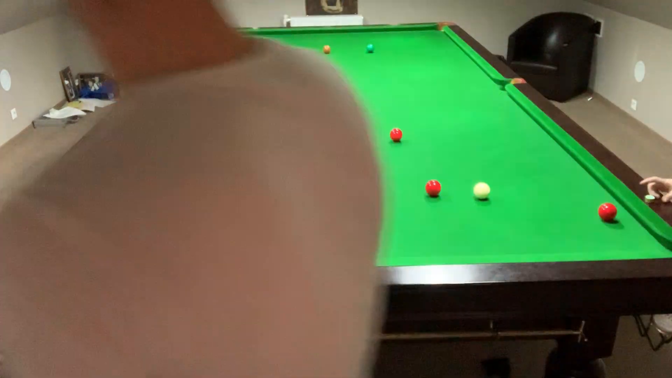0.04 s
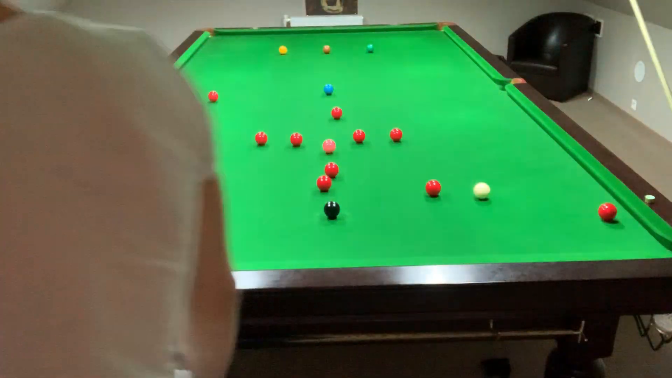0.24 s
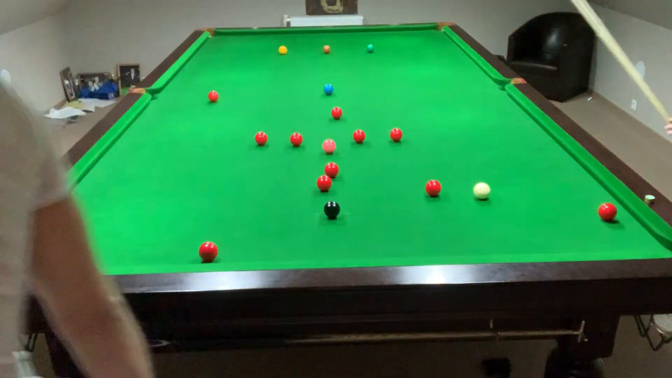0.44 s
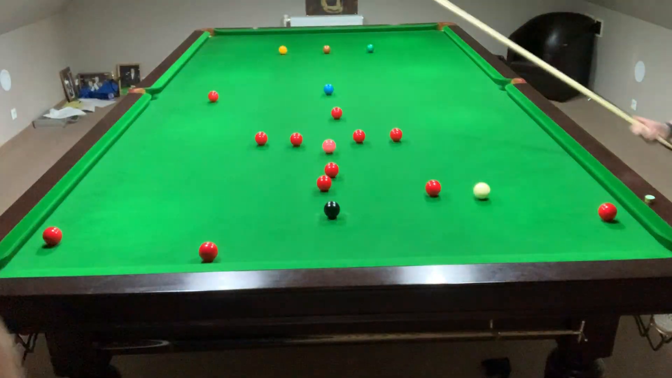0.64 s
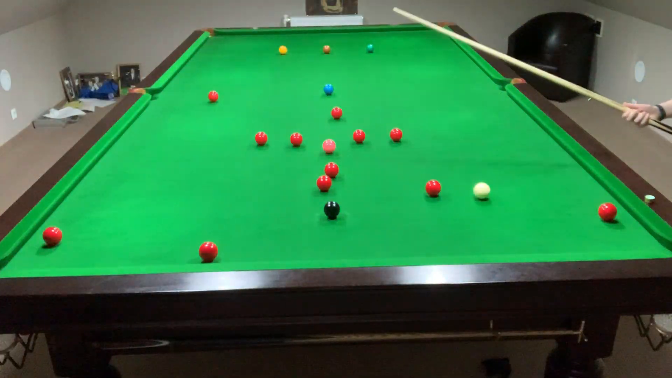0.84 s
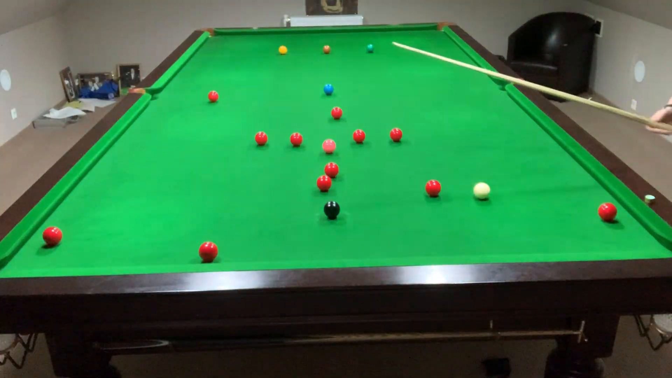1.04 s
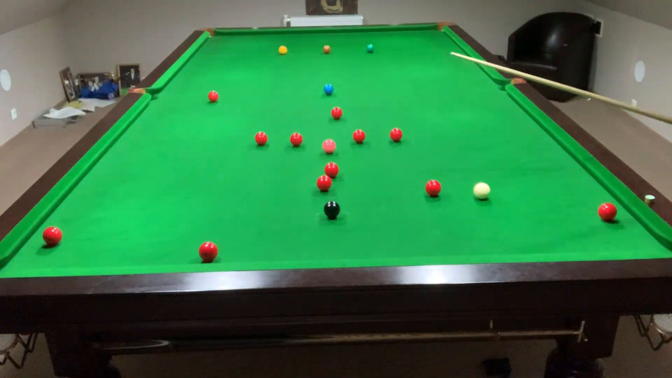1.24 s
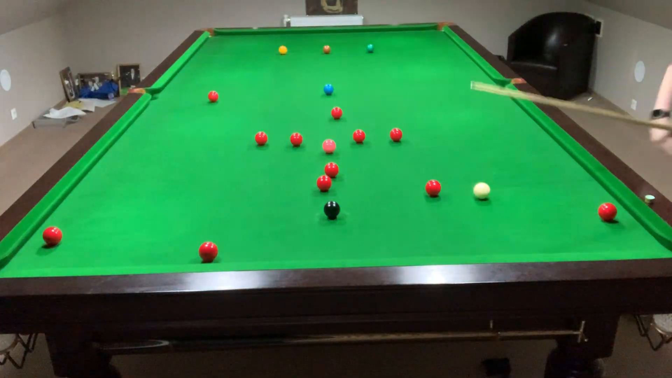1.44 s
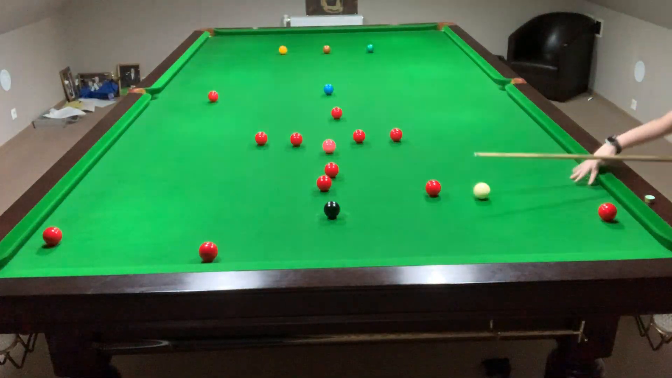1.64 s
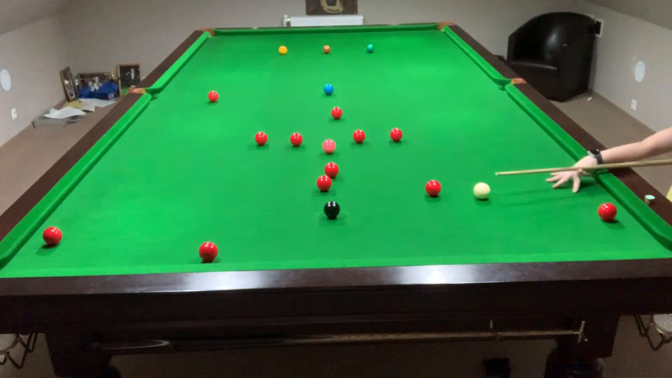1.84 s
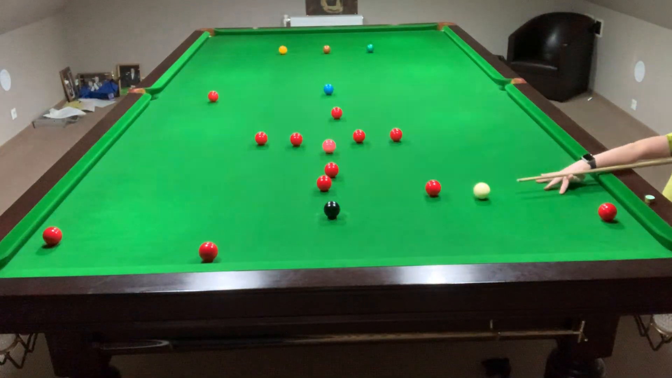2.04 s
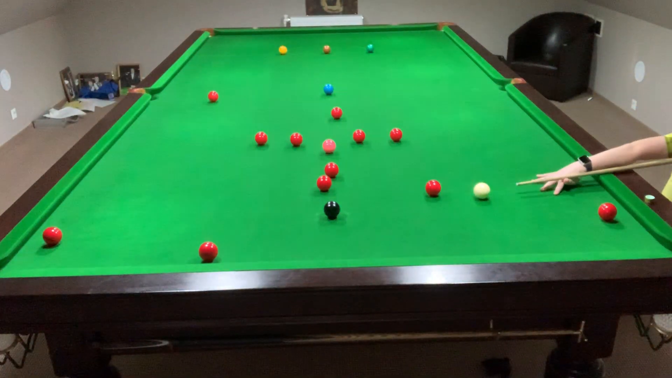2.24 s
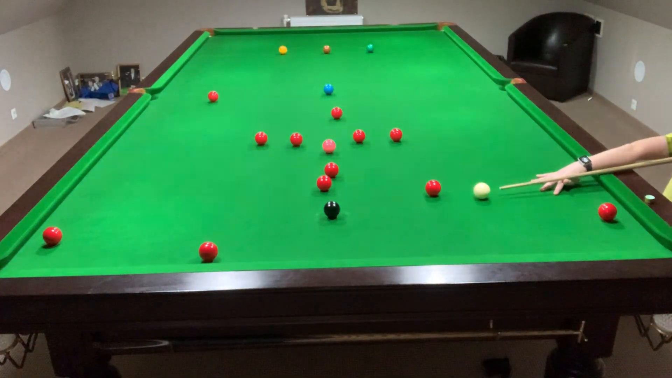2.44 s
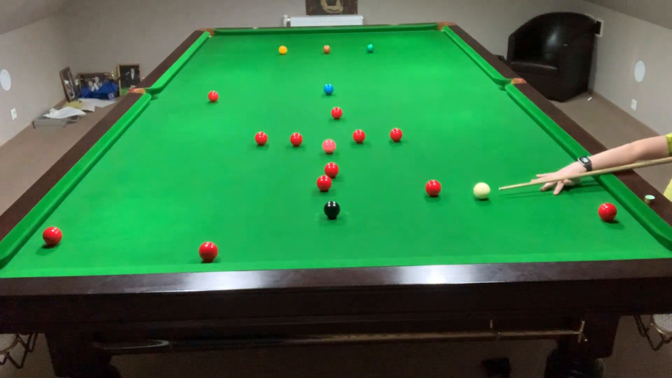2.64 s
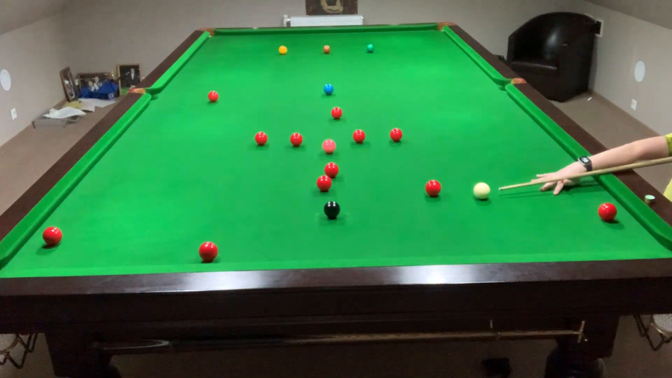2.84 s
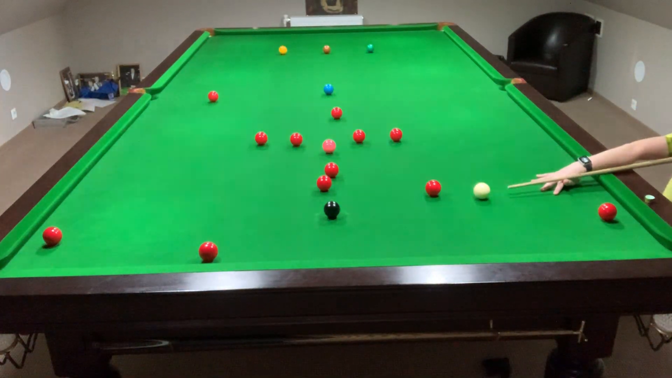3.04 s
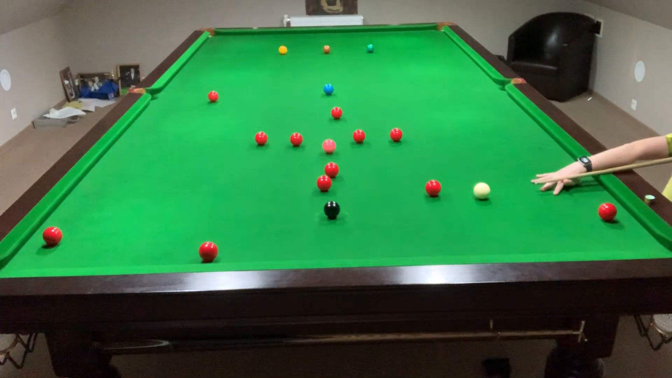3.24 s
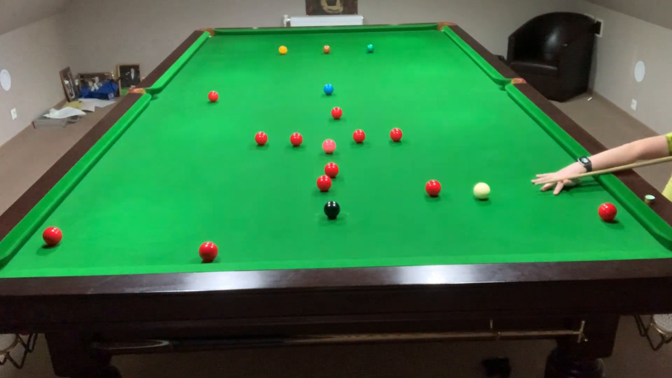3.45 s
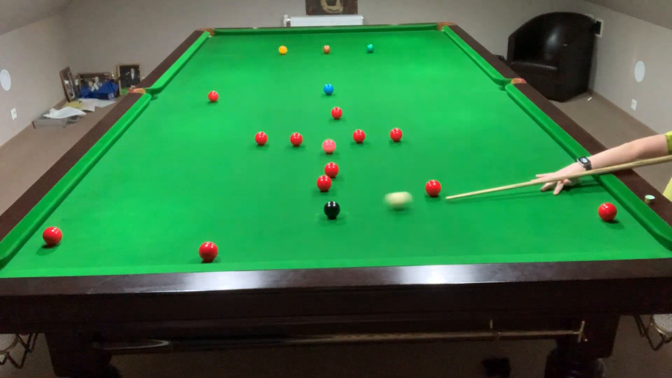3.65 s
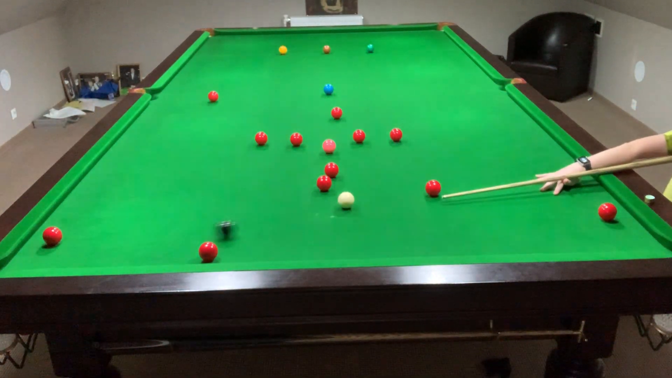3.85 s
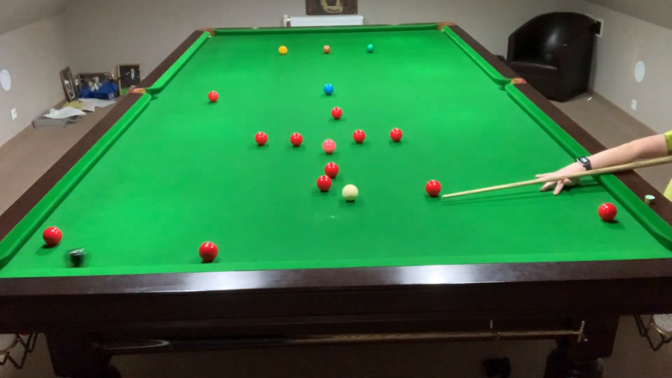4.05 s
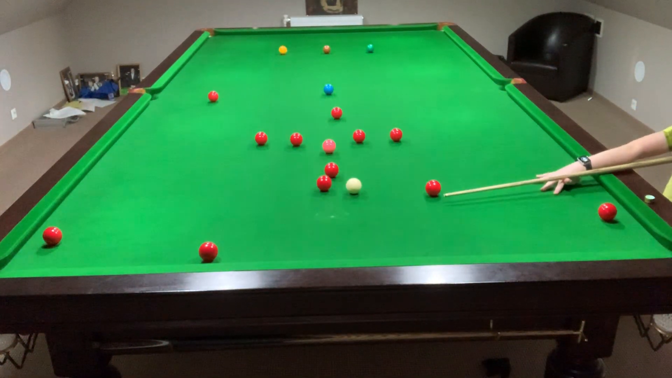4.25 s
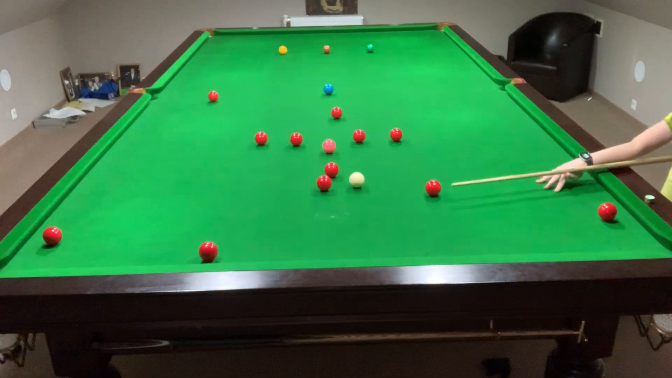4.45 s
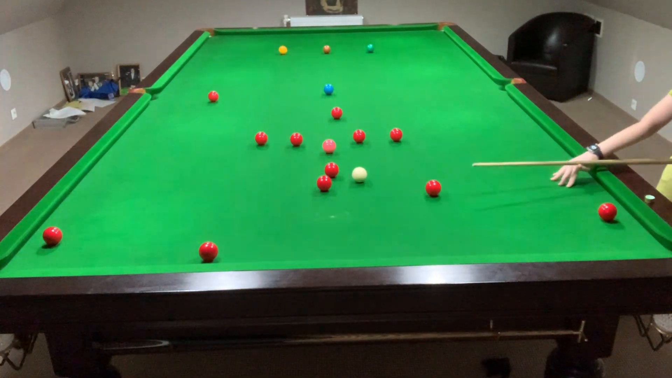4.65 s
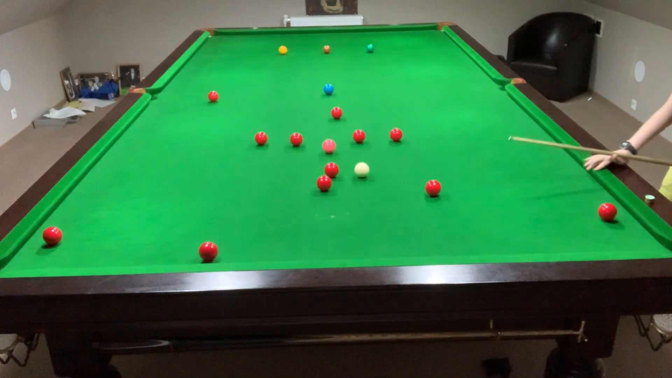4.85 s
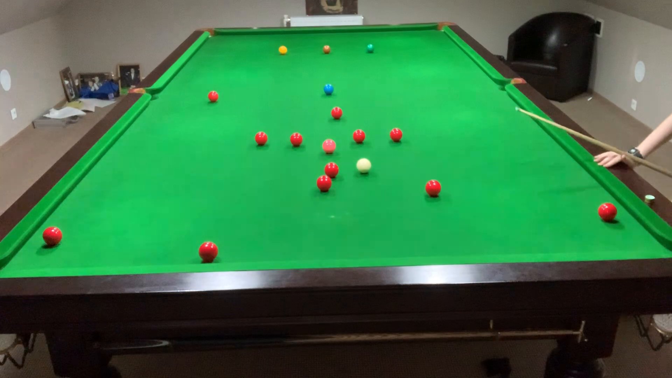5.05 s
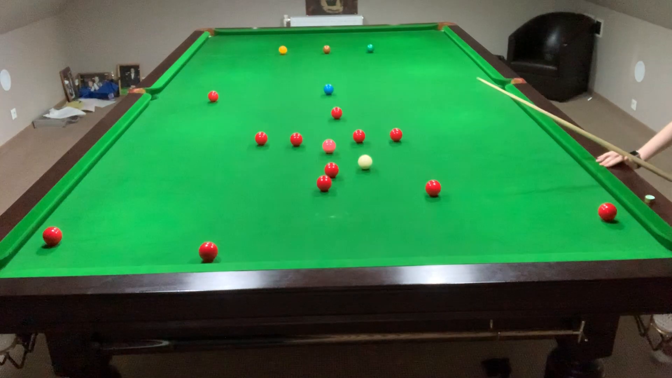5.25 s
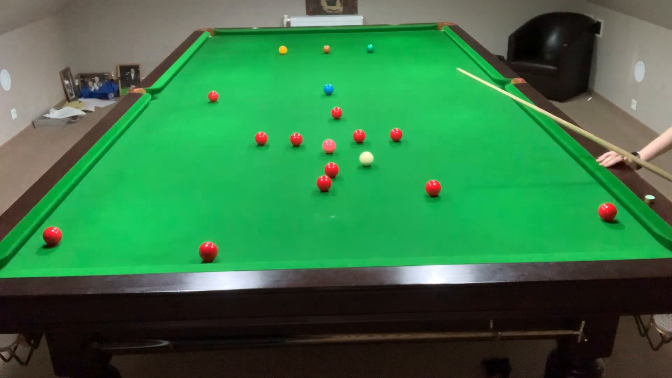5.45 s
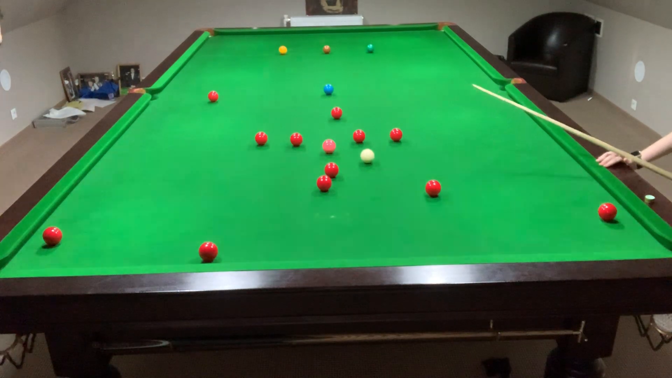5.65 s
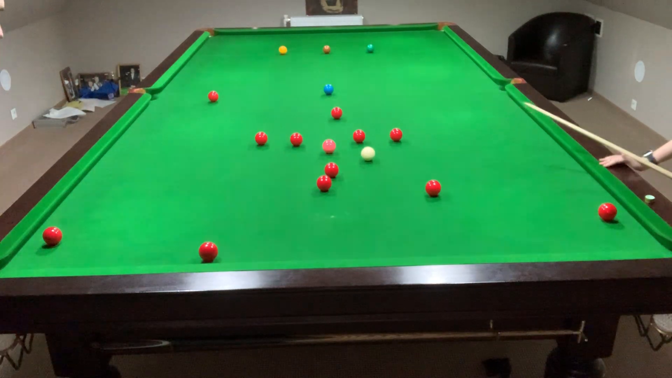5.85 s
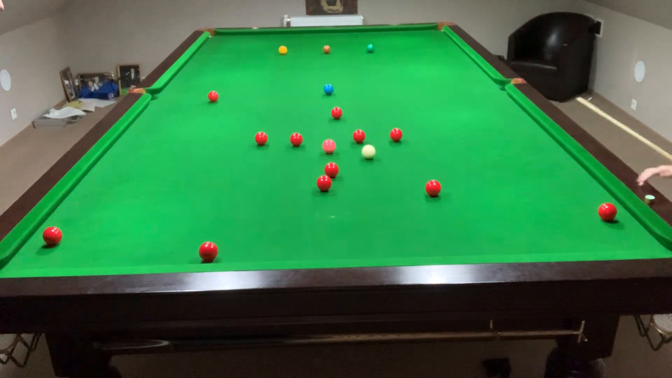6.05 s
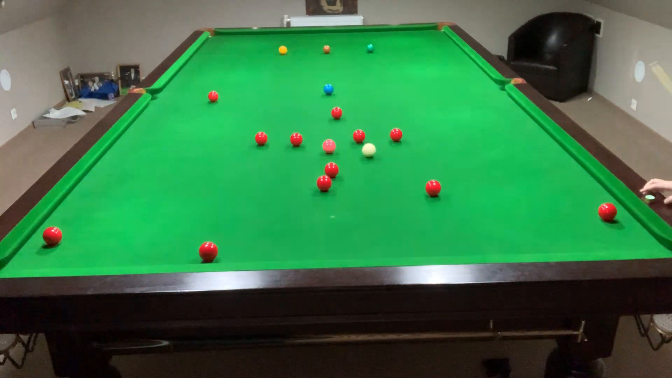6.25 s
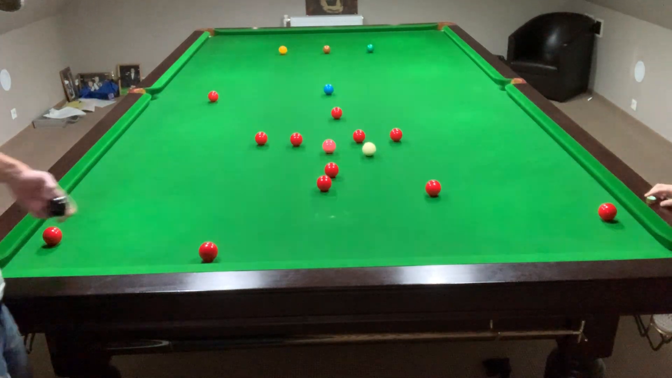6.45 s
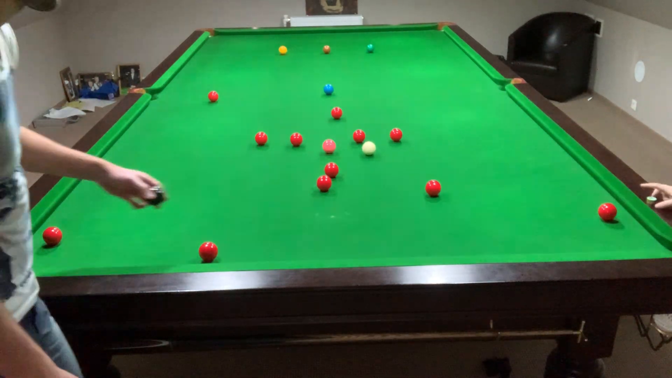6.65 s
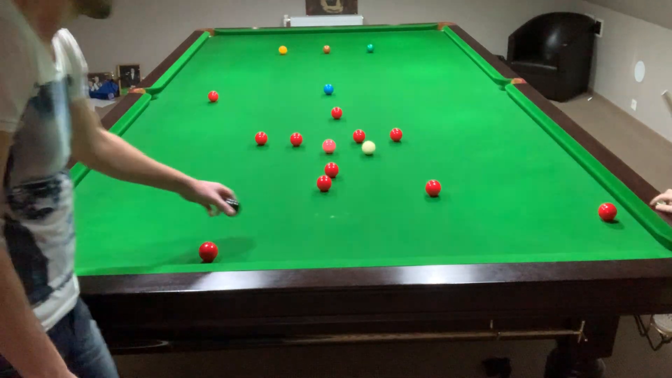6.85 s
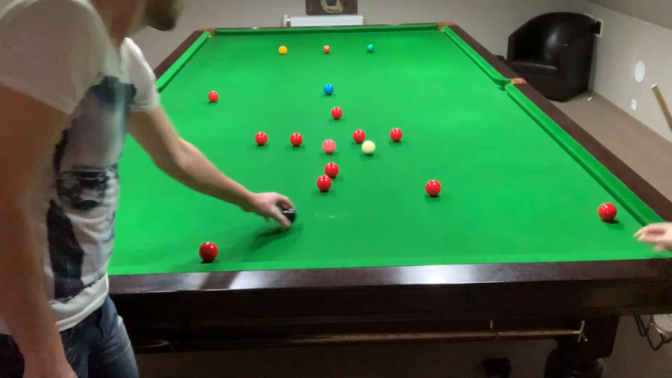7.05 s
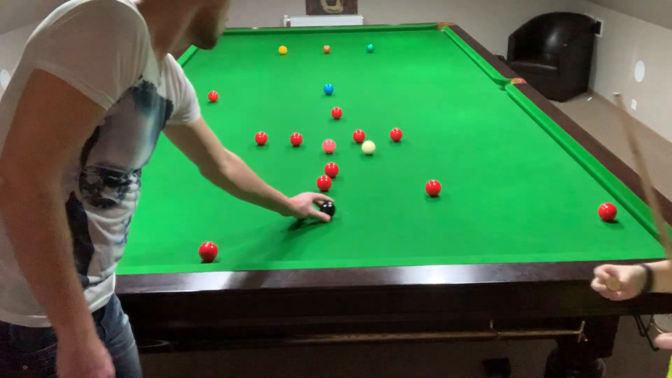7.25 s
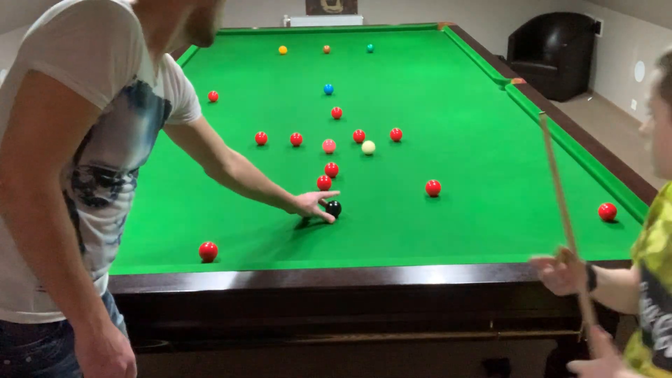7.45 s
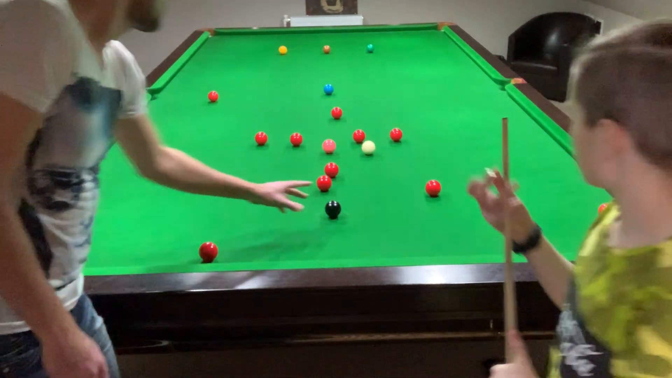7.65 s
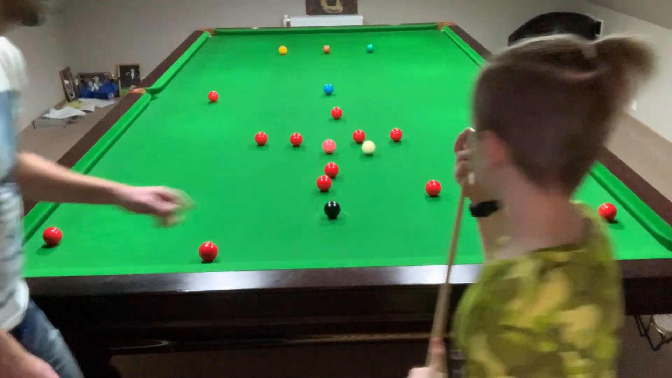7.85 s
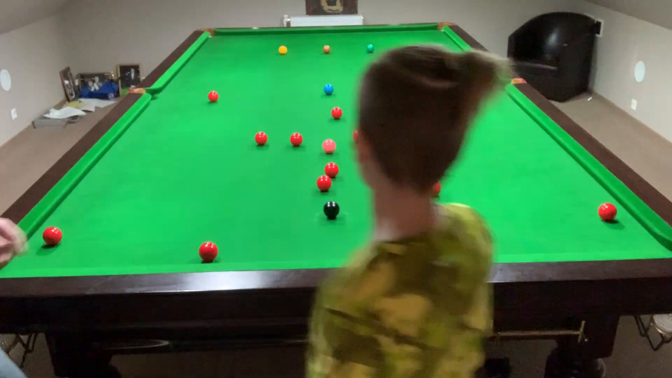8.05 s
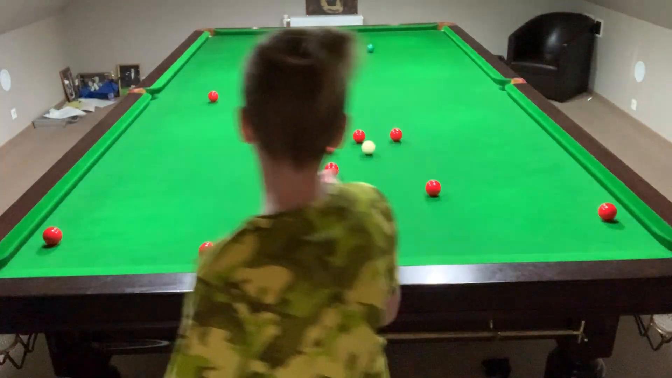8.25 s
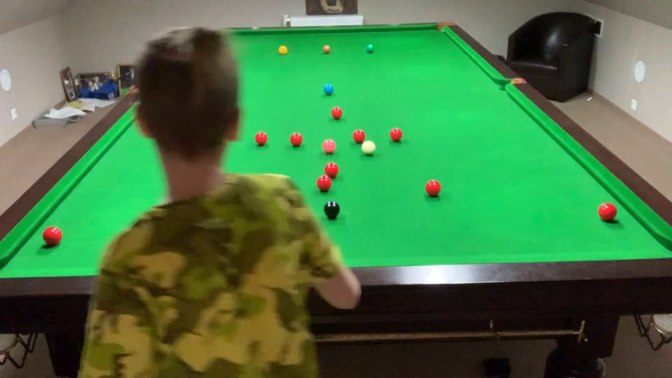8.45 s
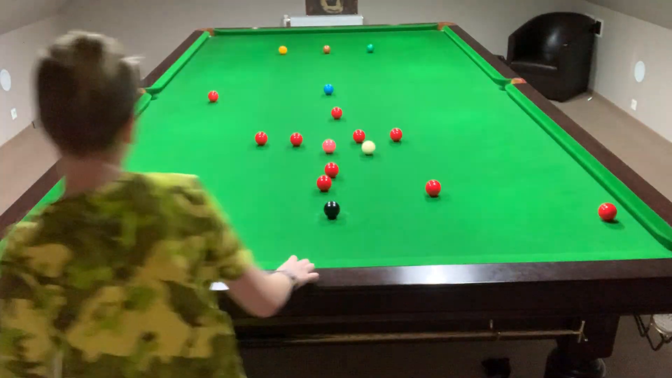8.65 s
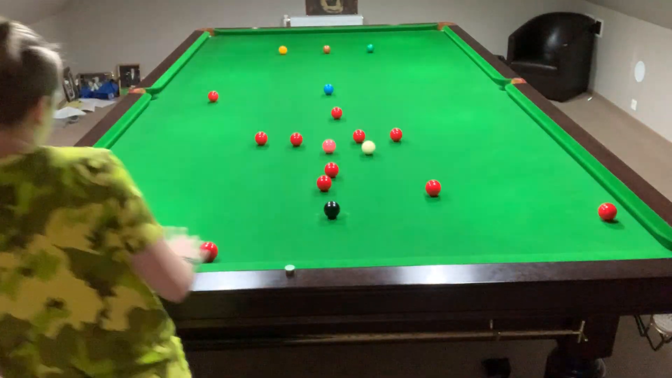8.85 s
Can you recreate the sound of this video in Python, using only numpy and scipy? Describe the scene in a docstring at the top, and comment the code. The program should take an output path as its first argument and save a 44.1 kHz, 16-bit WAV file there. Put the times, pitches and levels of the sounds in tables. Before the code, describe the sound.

Close to a snooker table in a small, hard-walled room, clothes rustle softly over a low rumble, faint bird chirps and a muffled engine outside. After a quiet wait, the cue tip knocks the white, which clacks sharply into the black. Half a second later the black thuds and rattles in a woody pocket, then clicks against other balls in the rail. The engine revs up and drops away; soft footsteps and scuffs end the scene.

```python
"""A snooker shot in a small, hard-walled room: impacts through filtered pulses and damped modes.
The cue strikes the white, the white clicks into the black, and the black thuds into a corner pocket
and clicks against the balls in its rail. Filtered noise makes soft rustles, scuffs and footfalls.
Faintly through the walls, swept sines chirp as small birds and low harmonics rev up and down as an engine,
over a low rumble; reflections and a decaying diffuse tail form the room."""
import sys
import numpy as np
from scipy import signal
from scipy.fft import rfft, irfft, next_fast_len
from scipy.io import wavfile

SR = 44100
rng = np.random.default_rng(int(sys.argv[2]) if len(sys.argv) > 2 else 0)


def wav_record(signal):
    """Record a signal, one row per channel, as 16-bit PCM in the file named by sys.argv[1]."""
    frames = np.transpose(np.atleast_2d(signal))
    bounded = np.clip(frames, -1, 1)
    # unit amplitude maps onto the largest positive 16-bit level
    quanta = np.round(bounded * 32767).astype(np.int16)
    wavfile.write(sys.argv[1], SR, quanta)


N = 392931
TIME, HZ = np.arange(N) / SR, np.fft.rfftfreq(N, 1 / SR)

# Levels in the tables are relative; each source sets its own overall level.
# Engine speed and load: start_s, firing_rate_hz, level_db
ENGINE_COURSE = [(0.0, 50.8, -40.5), (0.4, 51.84, -40.5), (0.75, 52.8, -41), (0.972, 52.9, -66),
                 (1.241, 39.67, -43), (2.15, 41.13, -38.5), (2.65, 38.2, -47), (3.07, 41.02, -41),
                 (3.97, 48.78, -41), (4.209, 55.1, -35.5), (4.421, 62.1, -37.5), (4.72, 76, -37),
                 (4.95, 85.5, -28), (5.14, 86.7, -33), (5.33, 77, -53.5), (6.421, 52.2, -70),
                 (6.569, 53.3, -32.5), (6.73, 59.2, -41), (6.95, 55.44, -41), (7.15, 61.9, -35.5),
                 (7.4, 53, -47.5), (8.051, 52.7, -43.5), (8.3, 52.5, -55), (8.9, 52.6, -55)]
# Strength of firing orders 1, 2 and 3: level_db
FIRING_ORDERS = [1, -6.5, -9]
# Effect of walls and room resonances on the bass: frequency_hz, level_db
BASS_TRANSMISSION = [(40, -1.5), (45, -19), (52, -7), (58, 0.5), (63, -3.5), (76, 5), (81, -2), (85, 0.5),
                     (95, -3), (105, 0), (123, -3.5), (145, -2), (172, -11), (250, -20)]
# Spectrum of the room's rumble: frequency_hz, level_db
RUMBLE_SPECTRUM = [(20, -15.5), (35, -26.5), (50, 2.5), (85, -1), (150, -5), (220, -12.5), (400, -20.5),
                   (800, -24), (2000, -55), (6000, -60.5)]
RUMBLE_DB = -46

# Soft rustles: clothes brushing, the cue sliding over the hand, a chink's bright hiss:
# peak_s, fade_s, swish_level_db, hiss_level_db
RUSTLE_SWELLS = [(0.01, 0.058, -44.5, -57.5), (.15, 0.052, -58, -59), (0.48, 0.17, -58, -65.5),
                 (0.771, 0.24, -55, -58), (1.38, 0.099, -60.5, -61.5), (1.9, 0.32, -60.5, -70.5),
                 (3.632, 0.083, -52.5, -64.5), (4.88, 0.79, -51.5, -73.5), (5.422, 0.045, -59.5, -57.5),
                 (7.0, 0.59, -62.5, -77), (7.33, 0.12, -56, -62), (7.849, 0.23, -62, -75),
                 (8.28, 0.033, -71, -61.5), (8.53, 0.093, -61, -59), (8.77, 0.052, -69, -58)]
RUSTLE_RISE = 0.47  # rising time as a share of fading time
STILL_SWISH_DB, STILL_HISS_DB = -61.5, -81.5  # what is left between the rustles
# Spectrum of the soft swish: frequency_hz, level_db
SWISH_SPECTRUM = [(150, -17), (300, 12.5), (700, 4.5), (1500, 2), (2500, -2.5), (4500, -9), (9000, -33),
                  (16000, -30)]
# Spectrum of the fine hiss: frequency_hz, level_db
HISS_SPECTRUM = [(1000, -5.5), (3000, 11), (5000, 8), (7500, 12), (9500, 6), (14000, -2.5), (16000, -3.5)]

# Low knocks that excite the table's wooden frame: start_s, level_db
FRAME_KNOCKS = [(0.0, -27), (4.2985, -1.5), (8.72, -33.5)]
# Modes of the wooden frame: pitch_hz, level_db, t60_s
FRAME_RESONANCES = [(273, -12, 0.93), (320, 3, 1), (346.4, 1.5, 0.87), (383, -5.5, 0.72), (415.6, -3, 0.54),
                    (521, -12, 0.37)]

# Chinks of a small piece of metal: start_s, level_db
METAL_CHINKS = [(.141, -48)]
# Modes of the metal: pitch_hz, level_db, t60_s
METAL_MODES = [(5450, -13, 0.087), (6250, -6, 0.043), (7070, 4.5, 0.047), (7450, 3.5, 0.12)]

# Bird chirps: start_s, level_db, reference_pitch_hz
BIRD_CHIRPS = [(0.325, 4, 4880), (1.308, 6.5, 4450), (1.76, -4.5, 4450), (1.84, -0.5, 4530),
               (2.094, -1, 4320), (2.34, -1, 5400), (2.554, -3, 4730), (2.852, 0, 4270), (3.007, 4.5, 5430),
               (3.309, -6.5, 4126), (3.418, -1, 4550), (3.585, 3, 4900), (4.09, -3, 4320),
               (4.236, -1.5, 5100), (4.675, 2, 4510), (5.105, -0.5, 5090), (5.167, 3.5, 4538),
               (5.3, -4, 4200), (5.681, 1, 4394), (5.812, 4.5, 4500), (5.85, 2, 4560), (6.211, 4.5, 4840),
               (6.802, -0.5, 4524), (6.911, -0.5, 4310), (7.104, -2.5, 5200), (7.462, -2, 5100),
               (7.634, 4.5, 4700), (8.058, 3, 4890), (8.66, 9, 4570), (8.762, 1, 5340)]
# Strokes within a chirp: delay_s, pitch_ratio (share of the reference), level_db
CHIRP_STROKES = [(0, 0.98, 2), (.026, .86, -3), (.062, .78, -0.5)]

# Cue tip on the white: one knock and its two early reflections: start_s, level_db
CUE_KNOCK = [(3.6492, -1), (3.6528, 7.5), (3.6568, -13.5)]
# Spectrum of the tip's knock: frequency_hz, level_db
CUE_SPECTRUM = [(100, -8), (250, -3.5), (500, -0.5), (1100, -0.5), (1800, -6), (2600, -4), (3600, -10.5),
                (4300, -7.5), (4800, -20), (6600, -20), (7600, -35), (12000, -31), (16000, -40.5)]
# Modes of the shaft: pitch_hz, level_db, t60_s
SHAFT_MODES = [(540, -14, 0.24), (835, -16, 0.55), (1043, -6.5, 0.64), (1290, -5.5, 0.58), (1557, -16, .25),
               (2180, -6, 0.043), (2470, 6, 0.088), (2654, 3, 0.064), (2880, 6, .06), (3194, 4.5, 0.06),
               (3600, -4, 0.082), (4240, 2, 0.059), (4280, 0.5, 0.094), (5520, -8, 0.065)]

# Ball on ball: start_s, level_db, contact_s, echo_level_db, tail_level_db
BALL_CONTACTS = [(3.8047, -2, 0.000015, 1, 1.5), (4.7398, -30, 0.000061, -2, -4),
                 (4.7933, -15, 0.00003, -3, -4.5), (4.8215, -14.5, 0.000077, -5.5, -6),
                 (4.83, -18.5, 0.000057, -4, -9)]
# Spectrum of a ball's clack: frequency_hz, level_db
BALL_SPECTRUM = [(800, -26.5), (1300, -24), (1850, -5), (2250, -3), (2700, -7), (3100, -6.5), (3550, -12),
                 (4100, -16), (4900, -26.5), (5900, -40), (8500, -36.5), (10500, -26.5), (14000, -28),
                 (16000, -30)]
# Dull knock of the table under the balls: frequency_hz, level_db
BED_SPECTRUM = [(100, -15), (400, -18), (850, -3), (1600, 5.5), (2200, -8), (5000, -46)]

# The black rattling into the corner pocket: start_s, rim_level_db, frame_level_db
POCKET_RATTLE = [(4.2864, 6, -12), (4.2962, -1, -6), (4.307, -22, -1.5), (4.3180, -10.5, -1),
                 (4.3316, -11, -6), (4.3360, -6, -2.5), (4.3590, -16, -3), (4.372, -17, -11.5),
                 (4.4090, -28, -5.5)]
# Spectrum of the hard rim: frequency_hz, level_db
RIM_SPECTRUM = [(150, -36.5), (400, -12.5), (635, 0.5), (720, -6), (820, 7), (940, -1.5), (1250, -12),
                (1460, -11.5), (1650, -17), (1930, -12), (2200, -24.5), (2600, -30.5), (4000, -38.5),
                (16000, -65)]
# Spectrum of the wooden frame: frequency_hz, level_db
FRAME_SPECTRUM = [(80, -51.5), (200, -11.5), (265, -5.5), (340, 5), (420, -6.5), (540, -18.5), (900, -17),
                  (2500, -70)]
# Modes of the rim: pitch_hz, level_db, t60_s
RIM_RESONANCES = [(673, -4, 0.67), (827, 1.5, .34), (900, -7.5, 0.52), (1220, -15, 0.26), (1440, -16, 0.16),
                  (1950, 2, 0.072)]

# Light, bright ticks: start_s, level_db
TICK_TIMES = [(4.5592, 3.5), (4.797, -16), (5.4032, -29), (6.2498, -23)]
# Spectrum of a tick: frequency_hz, level_db
TICK_SPECTRUM = [(300, -9), (1500, 7.5), (4000, 0.5), (6500, 6), (8500, 11.5), (11000, 4.5), (14000, -1),
                 (16000, 3)]
# Soft, dull footfalls: start_s, level_db
FOOTFALLS = [(5.34, -24.5), (6.62, -22.5), (6.88, -30), (7.17, -25)]
# Spectrum of a footfall: frequency_hz, level_db
FOOTFALL_SPECTRUM = [(90, -16), (210, 6.5), (340, 2.5), (520, -16), (880, -3), (1300, -40.5)]
# Scuffs of feet and hands by the table: start_s, level_db, swell_s
SCUFF_RUBS = [(6.68, -11.5, 0.032), (6.79, -5, 0.019), (7.835, -7, .012), (7.972, -11.5, .002),
              (8.189, -8, 0.011), (8.44, -3, 0.031), (8.666, 2, .002), (8.681, 0.5, .005),
              (8.715, -8, .003)]
# Spectrum of a scuff: frequency_hz, level_db
SCUFF_SPECTRUM = [(150, -14), (350, 10.5), (700, 0.5), (2000, 9), (4300, 1), (5200, -5.5), (8000, -13),
                  (16000, -59)]
GRAINS_PER_S, GRAIN_SPREAD_DB = 3000, 4  # how often a rub catches, and how unevenly

# First reflections off table, ceiling and walls: delay_s, level_db, left_late_s
REFLECTIONS = [(.0047, -4.5, -.00006), (.0066, -3, .0002), (0.016, -8.5, .00004), (0.0211, -5, -.0001),
               (.0296, -13, 0), (0.0378, -9.5, .00004)]
# Decay of the diffuse tail: frequency_hz, t60_s
TAIL_DECAY = [(100, 1), (350, 0.92), (900, 0.55), (2000, 0.33), (4000, 0.28), (8000, 0.21), (15000, 0.13)]
# Left-right likeness of diffuse sound: frequency_hz, correlation (unitless)
LIKENESS = [(60, 0.85), (130, 0.76), (260, 0.36), (500, 0), (1000, 0), (4000, 0)]
# Phase by which the left microphone port leads: frequency_hz, phase_rad
PORT_LEAD = [(5000, .6), (7000, 2.2), (9000, 3.14), (10200, 2.6), (12500, .3), (16000, 0)]
EDGE_HZ = 15900  # upper band limit


def amp(db):
    """Decibel law: twenty decibels for each tenfold amplitude."""
    return 10 ** (np.asarray(db) / 20)


def evened(x):
    """Power normalization: scales the signal to unit RMS."""
    return x / np.sqrt(np.mean(x ** 2) + 1e-20)


def read(points, hz):
    """Logarithmic frequency scale: joins the points by straight lines on it."""
    f, value = np.transpose(points)
    return np.interp(np.log(hz + 1), np.log(f), value)


def add(mix, s, sound):
    """Superposition: adds a sound at its start in seconds, cut at the end of the mix."""
    part = mix[max(round(s * SR), 0):][:len(sound)]
    part += sound[:len(part)]


def pulse(spectrum, size=4096):
    """Minimum phase: the most compact causal click with this spectrum, of energy 1."""
    hz = abs(np.fft.fftfreq(size, 1 / SR))
    log_gain = np.log(amp(read(spectrum, hz)))
    # The Hilbert transform of the log gain gives the minimum phase
    response = np.exp(np.conj(signal.hilbert(log_gain)))
    click = np.fft.ifft(response).real[:size // 2]
    return click / np.linalg.norm(click)


def ring(modes):
    """Modal superposition: one exponentially damped sine for each mode, over one second."""
    t = np.arange(SR) / SR
    out = np.zeros(SR)
    for hz, db, t60 in modes:
        decay = np.exp(-np.log(1000) * t / t60)
        out += amp(db) * decay * np.sin(2 * np.pi * hz * t)
    return out


def strike(rows, sound):
    """Linear excitation: the same response at each start, scaled by its level in dB."""
    out = np.zeros(N)
    for s, db in rows:
        add(out, s, amp(db) * sound)
    return out


def grit(swell_s):
    """Stick-slip friction: many uneven catches that swell and die away, of total energy 1."""
    u = np.arange(int(8 * swell_s * SR)) / (swell_s * SR)
    catches = rng.standard_normal(len(u)) * amp(GRAIN_SPREAD_DB * rng.standard_normal(len(u)))
    caught = rng.random(len(u)) < GRAINS_PER_S / SR
    catches *= caught * u * np.exp(-u)
    return catches / (np.linalg.norm(catches) + 1e-20)


def diffuse(spectrum, size=N):
    """Diffuse-field coherence: stereo noise alike in the bass and unrelated higher up."""
    padded = next_fast_len(size)
    a, b = rfft(rng.standard_normal((2, padded)))
    hz = np.fft.rfftfreq(padded, 1 / SR)
    same = np.clip(read(LIKENESS, hz), -1, 1)
    pair = np.array([a, same * a + np.sqrt(1 - same ** 2) * b])
    return evened(irfft(pair * amp(read(spectrum, hz)), padded)[:, :size])


def room(x, echo_db, tail_db, left_late=0., build_s=0.0014, scatter_hz=4500):
    """Room impulse response: direct sound, dulled reflections and a tail decaying by frequency."""
    flat = [(1, 0), (SR, 0)]
    hz, t, z = signal.stft(diffuse(flat, size=SR), SR, nperseg=256)
    decay = np.exp(-np.log(1000) * t / read(TAIL_DECAY, hz)[:, None])
    tail = signal.istft(z * decay, SR)[1][:, :SR]
    tail *= 1 - np.exp(-TIME[:SR] / build_s)
    response = amp(tail_db) * tail / np.linalg.norm(tail[0])

    low_pass = signal.butter(1, scatter_hz, fs=SR)
    bounce = signal.lfilter(*low_pass, signal.unit_impulse(SR // 100))
    paths = [(0.001, left_late, np.ones(1))]  # direct sound
    paths += [(s, late, amp(db + echo_db) * bounce) for s, db, late in REFLECTIONS]
    for s, late, sound in paths:
        add(response[0], s + max(late, 0), sound)
        add(response[1], s + max(-late, 0), sound)

    out = np.zeros((2, N))
    first, last = np.flatnonzero(x)[[0, -1]]
    for ear, path in zip(out, response):
        add(ear, first / SR, signal.oaconvolve(x[first:last + 1], path))
    return out


def engine(flutter_db=1.74):
    """Harmonic firing orders: those low enough to pass the walls swell at resonances and flutter."""
    s, hz, db = np.transpose(ENGINE_COURSE)
    rate, load_db = np.interp(TIME, s, hz), np.interp(TIME, s, db)
    cycles, hum = np.cumsum(rate) / SR, np.zeros(N)
    for k, order_db in enumerate(FIRING_ORDERS, 1):
        flutter = signal.resample(rng.standard_normal(size=120), N)
        path_db = read(BASS_TRANSMISSION, k * rate)
        strength = amp(load_db + order_db + path_db + flutter_db * flutter)
        hum += strength * np.sin(2 * np.pi * (k * cycles + rng.random()))
    return np.sqrt(2) * hum  # sine levels count as RMS


def rumble():
    """Broadband diffuse field: steady stereo noise weighted towards the bass."""
    return amp(RUMBLE_DB) * diffuse(RUMBLE_SPECTRUM)


def rustles(swish_db=3, hiss_db=4, grain_db=1.5):
    """Frictional noise: a soft swish and a fine, grainy hiss swell and die away with each rustle."""
    swish, hiss = amp(STILL_SWISH_DB), amp(STILL_HISS_DB)
    for s, fade_s, soft_db, fine_db in RUSTLE_SWELLS:
        swell = np.exp(-np.maximum(TIME - s, (s - TIME) / RUSTLE_RISE) / fade_s)
        # Unrelated noises add in power
        swish = np.hypot(swish, amp(soft_db) * swell)
        hiss = np.hypot(hiss, amp(fine_db) * swell)
    grain = signal.resample(rng.standard_normal(size=900), N)
    soft = amp(swish_db) * swish * diffuse(SWISH_SPECTRUM)
    fine = amp(hiss_db + grain_db * grain) * hiss * diffuse(HISS_SPECTRUM)
    return soft + fine


def table_frame(ring_db=-21.0):
    """Modal resonance: low knocks set the wooden frame booming, close by and so without room."""
    return amp(ring_db) * strike(FRAME_KNOCKS, ring(FRAME_RESONANCES))


def metal_chink():
    """Modal resonance: a small piece of metal rings briefly in high damped modes."""
    return room(strike(METAL_CHINKS, ring(METAL_MODES)), echo_db=-12, tail_db=4.5)


def birds(level_db=-59.5, length_s=.044, fall=0.26, flick=0.219, vary=.25, throb_db=8):
    """Frequency modulation: three wavering strokes flick up and slide down, blurred by the walls."""
    out = np.zeros(N)
    for s, db, hz in BIRD_CHIRPS:
        for delay, step, stroke_db in CHIRP_STROKES:
            stretch, slide = np.exp(vary * rng.uniform(-1, 1, 2))
            u = np.linspace(0, 1, int(length_s * stretch * SR))
            waver = signal.resample(rng.standard_normal(size=24), len(u))
            throb = signal.resample(rng.standard_normal(size=16), len(u))
            pitch = hz * step * (1 - fall * slide * u ** 2 - flick * np.exp(-10 * u))
            pitch *= 1 + .036 * waver
            swell = evened(signal.windows.tukey(len(u), .5) * amp(throb_db * throb)) / 2
            tone = np.sin(2 * np.pi * np.cumsum(pitch) / SR)
            add(out, s + delay, amp(db + stroke_db + level_db) * swell * tone)
    return room(out, echo_db=0, tail_db=4.5, build_s=.012)


def cue(thud_db=-9, ring_db=-26, contact_s=0.0011):
    """Impact excitation: the tip knocks dully and, while pressing on the ball, sets the shaft ringing."""
    thud = amp(thud_db) * strike(CUE_KNOCK, pulse(CUE_SPECTRUM))
    onset = 1 - np.exp(-TIME[:SR] / contact_s)
    impact_s = CUE_KNOCK[0][0]
    shaft = amp(ring_db) * strike([(impact_s, 0)], ring(SHAFT_MODES) * onset)
    knock = room(thud, echo_db=-14, tail_db=5, left_late=.00012)
    return knock + room(shaft, echo_db=-20, tail_db=-7, left_late=.00005)


def balls(level_db=10, bed_db=-11):
    """Elastic collision: a longer contact filters the clack duller; the table beneath knocks faintly."""
    out = np.zeros((2, N))
    bed_blows = []
    for s, db, contact_s, echo_db, tail_db in BALL_CONTACTS:
        r = np.exp(-1 / (contact_s * SR))
        # Two equal poles smooth the pulse over the contact time
        clack = signal.lfilter([(1 - r) ** 2], np.poly([r, r]), pulse(BALL_SPECTRUM))
        click = strike([(s, db + level_db)], clack)
        out += room(click, echo_db, tail_db, left_late=.00009, build_s=.005)
        bed_blows.append((s, db + echo_db))
    bed = amp(bed_db) * strike(bed_blows, pulse(BED_SPECTRUM))
    return out + room(bed, echo_db=0, tail_db=14.0, build_s=0.0058)


def pocket(rim_db=2, frame_db=8.0, rim_ring_db=-24.0, rub_db=-36, rub_s=0.03):
    """Friction and impact: the ball brushes the jaw, rings the rim and tumbles against the frame."""
    s, on_rim, on_frame = np.transpose(POCKET_RATTLE)
    size = int(rub_s * SR)
    growing_rub = rng.standard_normal(size) * np.linspace(0, 1, size) ** 2
    brush = np.convolve(growing_rub, pulse(RIM_SPECTRUM))
    rim = amp(rim_db) * strike(zip(s, on_rim), pulse(RIM_SPECTRUM))
    rim += strike([(s[0] - rub_s, rub_db)], brush)
    frame = amp(frame_db) * strike(zip(s, on_frame), pulse(FRAME_SPECTRUM))
    rim_ring = strike([(s[0], rim_ring_db)], ring(RIM_RESONANCES))  # close by, so dry
    hard = room(rim, echo_db=-2.0, tail_db=3.5, build_s=0.00074)
    return hard + room(frame, echo_db=-15, tail_db=-1.5) + rim_ring


def ticks(level_db=-16):
    """Impulse response: light, bright clicks, heard mostly by way of the walls."""
    clicks = amp(level_db) * strike(TICK_TIMES, pulse(TICK_SPECTRUM))
    return room(clicks, echo_db=-6, tail_db=9.0, build_s=0.00088)


def footfalls(swell_s=0.028):
    """Filtered friction: each soft step is a short rub with a dull spectrum."""
    out = np.zeros(N)
    for s, db in FOOTFALLS:
        add(out, s, amp(db) * signal.fftconvolve(grit(swell_s), pulse(FOOTFALL_SPECTRUM)))
    return room(out, echo_db=-5, tail_db=2.5)


def scuffs(level_db=-22.5):
    """Stick-slip friction: feet and hands catch unevenly in a gritty, filtered rub."""
    out = np.zeros(N)
    for s, db, swell_s in SCUFF_RUBS:
        rub = signal.fftconvolve(grit(swell_s), pulse(SCUFF_SPECTRUM))
        add(out, s, amp(level_db + db) * rub)
    return room(out, echo_db=-5, tail_db=2.5)


def scene():
    """Superposition: the shot, the small noises, the sounds from outside and the rumble add linearly."""
    outside = engine() + birds()
    shot = table_frame() + cue() + balls() + pocket()
    small_noises = rustles() + metal_chink() + ticks() + footfalls() + scuffs()
    return outside + rumble() + shot + small_noises


def record(dry, shared_hz=6000):
    """Phase difference: in the treble both ports carry one signal, turned in phase; then a band limit."""
    left, right = rfft(dry)
    shared = 1 / (1 + (shared_hz / (HZ + 1)) ** 10)
    turned = left * np.exp(-1j * read(PORT_LEAD, HZ))
    right = np.sqrt(1 - shared) * right + np.sqrt(shared) * turned
    low_pass = signal.firwin(511, EDGE_HZ, window=("kaiser", 9), fs=SR)
    ports = irfft(np.array([left, right]), N)
    return signal.oaconvolve(ports, low_pass[None], "same", axes=1)


dry = scene()
out = record(dry)
wav_record(out)
```